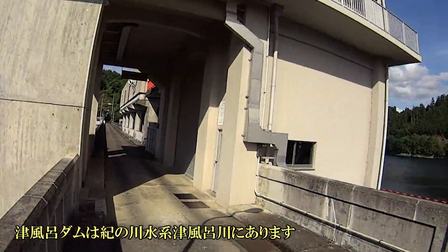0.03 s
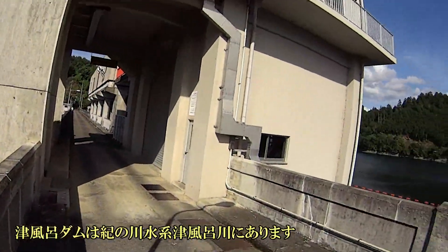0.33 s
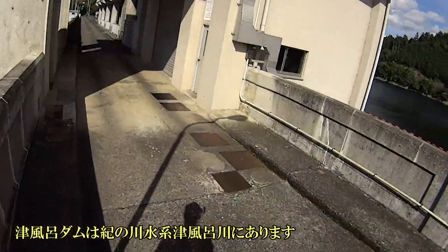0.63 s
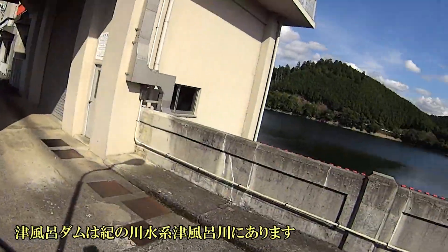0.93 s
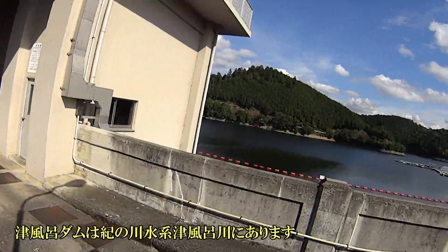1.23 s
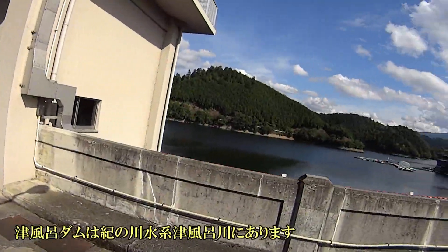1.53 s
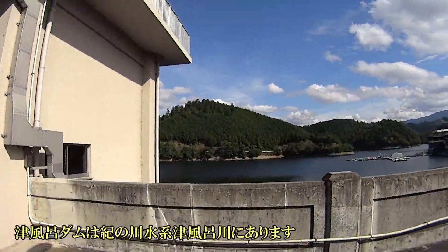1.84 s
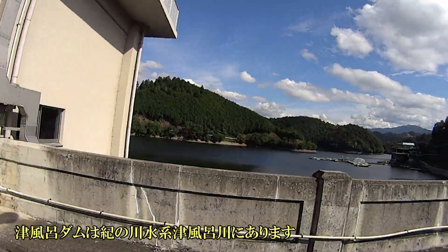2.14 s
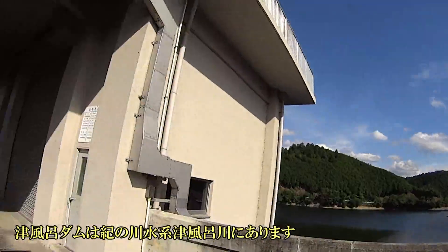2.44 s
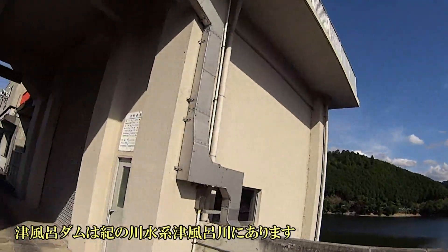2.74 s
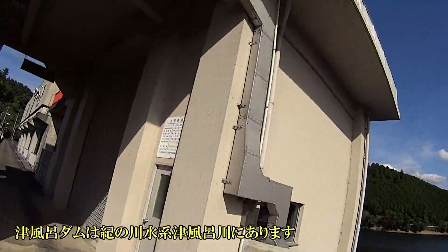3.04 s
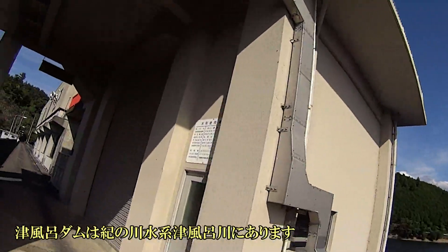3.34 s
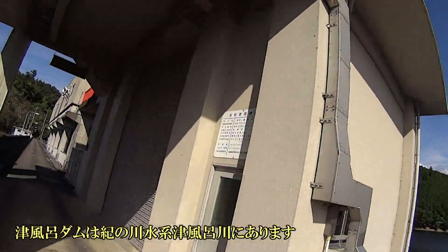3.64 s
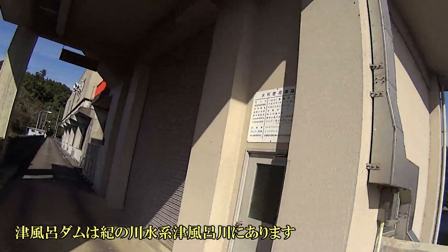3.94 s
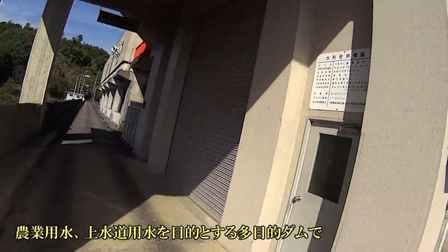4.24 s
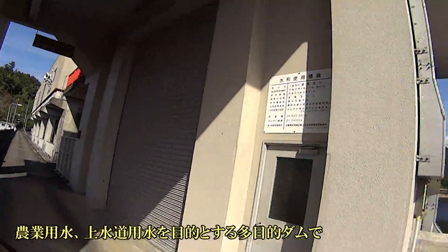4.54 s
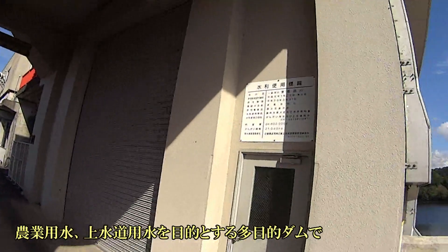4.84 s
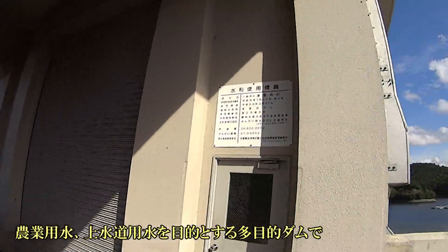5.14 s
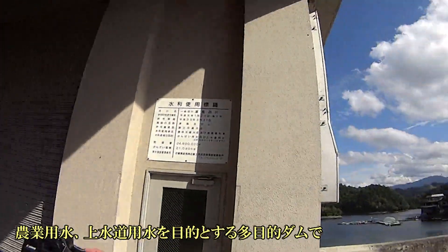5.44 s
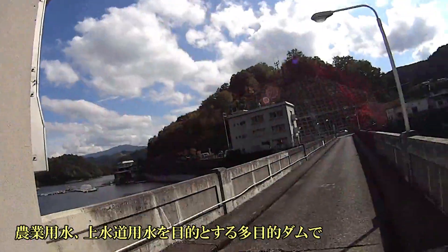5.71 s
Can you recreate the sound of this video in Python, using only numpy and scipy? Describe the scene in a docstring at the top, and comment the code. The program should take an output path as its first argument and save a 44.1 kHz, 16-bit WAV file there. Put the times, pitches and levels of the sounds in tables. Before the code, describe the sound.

Water rushes steadily far below and grows louder, while fingers knock and brush a hand-held microphone amid soft footstep thumps.

```python
"""Water rushes from a dam outlet far below, its countless splashes merging into a rumble, a roar and a hiss.
The rush swells and brightens as a walker on top of the dam comes out of the shelter of a wall.
It is heard through a small hand-held camera, with a light breeze rolling over the microphone openings.
Fingers brush and knock the plastic casing, which creaks and rings, and a loose part rattles against it.
The shifting grip jolts the camera, and each step reaches the microphone as a dull thump."""
import sys
import numpy as np
from scipy import signal
from scipy.fft import rfft, irfft
from scipy.io import wavfile

SR = 44100
rng = np.random.default_rng(int(sys.argv[2]) if len(sys.argv) > 2 else 0)


def file_out(sig):
    """Save sig as 16-bit WAV at sys.argv[1]."""
    # one column per channel
    cols = np.atleast_2d(sig).T
    # limit, then scale
    lim = np.clip(cols, -1, 1)
    pcm = np.round(lim * 32767).astype(np.int16)
    wavfile.write(sys.argv[1], SR, pcm)


N = 258853
TIME = np.arange(N) / SR
FREQS_HZ = np.maximum(np.fft.rfftfreq(N, 1 / SR), 1)
SIDES = np.array([[1], [-1]])   # left, right

# finger knocks on the casing: start_s, level_db (of the first 10 ms), brightness_hz
KNOCK_HITS = [(1.811, -22, 2180), (1.838, -24.5, 302), (1.8446, -17.5, 2620), (1.856, -17.5, 1490),
              (1.9814, -17, 1310), (2.312, -28, 1120), (2.316, -16, 1690), (2.37, -27.5, 690),
              (2.482, -34.5, 198), (2.843, -34, 1120), (2.916, -33, 1010), (2.9394, -28, 560),
              (3.054, -38, 282), (5.661, -38, 280)]


def from_db(db):
    """Turn decibels into a factor to multiply a sound by."""
    return 10 ** (np.asarray(db) / 20)


def rms_one(x):
    """Scale a signal so that its average size (rms) is 1."""
    return x / np.sqrt(np.mean(x ** 2) + 1e-20)


def at_each_freq(table):
    """Read a table at every frequency, with octaves evenly spaced."""
    hz, value = np.transpose(table)
    return np.interp(np.log(FREQS_HZ), np.log(hz), value)


def swing(curve):
    """How far a level curve lies above its average at each moment, in dB."""
    db = np.interp(TIME, *np.transpose(curve))
    return db - db.mean()


def drift(rate):
    """A smooth random wobble of size 1 that turns about `rate` times a second."""
    hold = np.exp(-80 * np.pi * rate / SR)
    noise = rng.standard_normal(N // 40 + 2002)
    slow = signal.lfilter([1], [1, -2 * hold, hold * hold], noise)[2000:]
    return np.interp(np.arange(N) / 40, np.arange(len(slow)), rms_one(slow))


def add(track, start_s, sound):
    """Mix a sound into a track at the given time."""
    at = int(start_s * SR)
    track[at:at + len(sound)] += sound[:max(N - at, 0)]


def panned(sound, left_db):
    """Make a sound stereo, louder on the left than on the right by left_db."""
    return sound * from_db(SIDES * left_db / 2)


def churning_noise(tone, churn_db, churn_rate):
    """Stereo noise at the microphone openings; its octaves swell partly together, partly alone."""
    # pitches at which the openings ring: pitch_hz, width_hz, boost_db
    resonances = [(797, 130, 4), (1176, 230, 2.5), (1550, 260, 5.5), (2000, 700, 8)]
    # how alike left and right are: pitch_hz, likeness (0 to 1)
    likeness = [(60, 0.99), (220, 0.89), (420, 1), (570, 0.63), (900, 0.89), (1150, 0.87), (1650, 0.99),
                (1850, 0.44), (2150, 1), (3100, 0.51), (5100, 0.86), (6000, 0.5), (6900, 0.56),
                (10000, 0.54)]
    # how much louder the left is: pitch_hz, left_db
    balance = [(60, 0), (200, 0.5), (400, -1.5), (750, -1), (1150, -3), (1650, -5), (2000, 2), (2600, -4),
               (3400, -3.5), (6000, -3), (6800, 0), (10000, 0)]
    boost_db = sum(db / (1 + (2 * (FREQS_HZ - hz) / width) ** 2) for hz, width, db in resonances)
    alike = np.clip(at_each_freq(likeness), 0, 1)
    shared, opposite = rfft(rng.standard_normal((2, N)))
    spectrum = np.sqrt(1 + alike) * shared + np.sqrt(1 - alike) * opposite * SIDES
    spectrum *= from_db(at_each_freq(tone) + boost_db + SIDES * at_each_freq(balance) / 2)
    octave = np.clip(np.log2(FREQS_HZ / 50), 0, 8)
    together, out = drift(churn_rate / 2), 0
    for k in range(9):
        band = irfft(spectrum * np.maximum(1 - abs(octave - k), 0), N)
        out = out + band * from_db(churn_db * (together / 2 + drift(churn_rate)))
    return rms_one(out)


def water():
    """Far splashes merge into a rumble, a roar and a hiss; the wall blocks the high sounds most."""
    # how openly the water is heard past the wall: time_s, level_db
    openness = [(0.0, -55), (0.59, -54), (1.06, -55), (1.35, -54), (2.34, -54), (2.58, -51.5),
                (3.14, -48.5), (4.07, -44.5), (4.94, -43), (5.57, -45.5), (5.72, -47.5), (5.87, -47)]
    # low rumble of the pool: pitch_hz, level_db
    pool_tone = [(30, -19), (80, -29), (140, -17), (230, -1.5), (310, -0.5), (450, -1), (650, -6.5),
                 (1200, -24)]
    # roar of the outflow: pitch_hz, level_db
    roar_tone = [(200, -10), (550, -17), (900, -10), (1100, -3.5), (1500, -9.5), (2100, -3.5), (2500, -6.5),
                 (3000, -11.5), (4000, -48)]
    # hiss of the spray: pitch_hz, level_db
    spray_tone = [(2000, -39), (3100, -0.5), (3900, -0.5), (4500, 0.5), (5050, 2.5), (5500, -3),
                  (6000, -6.5), (6700, -4), (7400, -8.5), (8400, -13), (9300, -11), (11000, -23)]
    swell_db = swing(openness)
    pool = from_db(-53.5 + 0.33 * swell_db) * churning_noise(pool_tone, churn_db=1.2, churn_rate=13)
    roar = from_db(-38.5 + 0.77 * swell_db) * churning_noise(roar_tone, churn_db=0.4, churn_rate=24)
    spray = from_db(-48.5 + swell_db) * churning_noise(spray_tone, churn_db=0.5, churn_rate=29)
    return pool + roar + spray


def breeze(level_db=-55.5, gustiness=1.83):
    """Light air rolls over the microphone openings in soft lumps."""
    # rise and fall of the breeze, before gustiness widens it: time_s, level_db
    gusts = [(0.0, -55), (1.54, -60.5), (2.34, -56), (3.73, -73), (4.53, -57.5), (5.87, -59.5)]
    # deep rumble of the air: pitch_hz, level_db
    air_tone = [(20, 3), (50, -6), (95, -5), (150, -5.5), (300, -14.5), (700, -37)]
    strength = from_db(level_db + gustiness * swing(gusts))
    return strength * churning_noise(air_tone, churn_db=2.5, churn_rate=13)


def struck(tones, t, vary_db):
    """Struck plastic rings with tones that differ in strength at each blow and drop 60 dB in fade_s."""
    ring = 0
    for k, (hz, db, fade_s) in enumerate(tones):
        strength = from_db(db + vary_db * rng.standard_normal() - 60 * t / fade_s)
        ring = ring + (-1) ** k * strength * np.sin(2 * np.pi * hz * t)
    return ring


def skid(ring, slip, slip_s):
    """A blow lands and then skids for a moment; every tiny slip starts the ring again."""
    t = TIME[:SR // 50]
    force = slip * rms_one(rng.standard_normal(len(t)) * np.exp(-t / slip_s)) / np.sqrt(len(t))
    force[0] = 1   # the blow itself
    return signal.fftconvolve(ring, force)


def rattles(brightness_hz=2400, bounce_s=0.0037, uneven=0.2, bounces=4):
    """A loose plastic part ticks softly against the casing, skids and bounces ever more weakly."""
    # runs of bounces: start_s, peak_db, fade_s
    runs = [(0.149, -22, 0.078), (0.1781, -19.5, 0.044), (0.2016, -23, .015), (0.21, -16.5, 0.048),
            (0.2505, -14, .012), (4.665, -23, 0.014)]
    # ringing tones of the loose part: pitch_hz, level_db, fade_s
    part_tones = [(1130, -4, 0.017), (1390, 7.5, 0.0033), (2000, 5, 0.0075), (2430, -9, 0.0062)]
    out, t = np.zeros(N), TIME[:SR // 20]
    dull = signal.butter(2, brightness_hz, fs=SR, output="sos")
    for start_s, db, fade_s in runs:
        late_s = 0
        for gap_s in bounce_s * (1 + uneven * rng.uniform(-1.1, 1, bounces)):
            ring = struck(part_tones, t, vary_db=5)
            tick = signal.sosfilt(dull, skid(ring, slip=0.62, slip_s=0.003))
            add(out, start_s + late_s, from_db(db - 60 * late_s / fade_s) * tick / abs(tick).max())
            late_s += gap_s
    return out


def grainy_bursts(bursts, tone):
    """Rough noise that swells and fades with the pressure of each short push."""
    pressure = sum(from_db(db) * np.exp(-((TIME - middle_s) / half_length_s) ** 2 / 2)
                   for middle_s, db, half_length_s in bursts)
    return pressure * churning_noise(tone, churn_db=2, churn_rate=120)


def brushing():
    """Skin sticks and slips as it drags over the casing."""
    # finger strokes: middle_s, level_db, half_length_s
    strokes = [(0.2, -42, 0.03), (1.833, -24, 0.0015), (1.856, -33.5, 0.016), (5.64, -36, 0.063)]
    # scratchy sound of skin on plastic: pitch_hz, level_db
    skin_tone = [(200, -7), (1200, 4.5), (3200, -4.5), (5000, -6.5), (7000, -16), (11000, -22)]
    return grainy_bursts(strokes, skin_tone)


def knocks(push_s=0.00093, push_gain=1.24):
    """A finger pushes the casing and sets it ringing; a soft touch dulls the blow."""
    # ringing tones of the casing: pitch_hz, level_db, fade_s
    casing_tones = [(311, -11, 0.025), (379, -2.5, 0.027), (522, -2.5, 0.027), (698, -18.5, 0.14),
                    (775, -8, 0.009), (1100, 3.5, 0.028), (1340, 0.5, 0.017), (1580, -1, 0.013),
                    (1794, -2.5, 0.0099), (2973, 2.5, 0.011), (4770, -25, .008)]
    out, t = np.zeros(N), TIME[:SR // 5]
    for start_s, db, brightness_hz in KNOCK_HITS:
        blow = struck(casing_tones, t, vary_db=3.0) + push_gain * np.exp(-t / push_s)
        blow = skid(blow, slip=0.073, slip_s=0.016)
        blow = signal.sosfilt(signal.butter(2, brightness_hz, fs=SR, output="sos"), blow)
        opening_rms = np.sqrt(np.mean(blow[:SR // 100] ** 2))
        add(out, start_s, from_db(db) * blow / opening_rms)
    return out


def creaks(delay_s=0.005, softer_db=11.5, half_length_s=0.0089):
    """The casing creaks under the grip, and again as it springs back from each knock."""
    # squeezes of the hand: middle_s, level_db, half_length_s
    squeezes = [(1.848, -18.5, 0.005), (4.65, -36, 0.032)]
    # sound of creaking plastic: pitch_hz, level_db
    creak_tone = [(150, -10), (340, 5), (520, 0), (700, -3), (1100, 10), (1500, -2), (2000, -16.5),
                  (2500, -32), (3000, -6.5), (3700, -26), (9000, -52)]
    rebounds = [(start_s + delay_s, db - softer_db, half_length_s) for start_s, db, _ in KNOCK_HITS]
    return grainy_bursts(squeezes + rebounds, creak_tone)


def jolts(slowing_s=0.057, uneven=0.22):
    """Each jolt swells and dies as a few uneven, slowing swings of the hand."""
    # shifts of the grip: start_s, peak_db, pitch_hz, swell_s
    shifts = [(1.853, -16, 87, 0.015), (2.93, -31, 115, 0.0095), (4.63, -38, 150, 0.0084)]
    out, t = np.zeros(N), TIME[:SR // 3]
    for start_s, db, hz, swell_s in shifts:
        pitch_hz = hz * np.exp(-t / slowing_s) * (1 + uneven * drift(27)[:len(t)])
        strength = from_db(db) * t / swell_s * np.exp(1 - t / swell_s)
        add(out, start_s, strength * np.sin(2 * np.pi * np.cumsum(pitch_hz) / SR))
    return out


def steps(count=7, first_s=2.32, gap_s=0.552, first_db=-37.5, softer_db=1, half_length_s=0.046):
    """Evenly paced steps shake the camera in the hand: short rumbles that grow softer."""
    # deep thump of a step: pitch_hz, level_db
    thump_tone = [(15, 0), (40, -2.5), (60, -17), (110, -18.5), (250, -35), (700, -67)]
    thumps = [(first_s + k * gap_s, first_db - k * softer_db, half_length_s) for k in range(count)]
    return grainy_bursts(thumps, thump_tone)


def scene():
    """Water and air all around; knocks land more on the right, jolts more on the left."""
    handling = rattles() + brushing() + panned(knocks(), left_db=-3.0)
    handling += creaks() + panned(jolts(), left_db=3.5)
    return water() + breeze() + handling + steps()


def record(dry, lowest_hz=14, highest_hz=11100):
    """Middle pitches reach the right microphone first; the deepest bass and highest treble are cut."""
    # how far the left wave runs ahead of the right (below 0: behind): pitch_hz, lead_radians
    left_lead = [(30, 0.14), (130, -0.44), (300, -1.07), (550, -1.67), (1250, -1.8), (1830, -0.93),
                 (2150, -1.5), (3700, -0.19), (6500, 0.1)]
    phase_shift = np.exp(1j * SIDES * at_each_freq(left_lead) / 2)
    heard = irfft(rfft(dry) * phase_shift, N)
    heard = signal.sosfilt(signal.butter(1, lowest_hz, "high", fs=SR, output="sos"), heard)
    return signal.sosfilt(signal.ellip(12, 0.2, 80, highest_hz, fs=SR, output="sos"), heard)


dry = scene()
out = record(dry)
file_out(out)
```